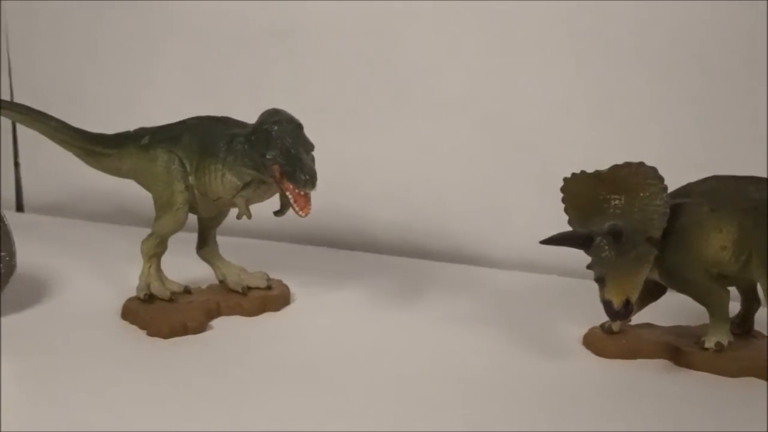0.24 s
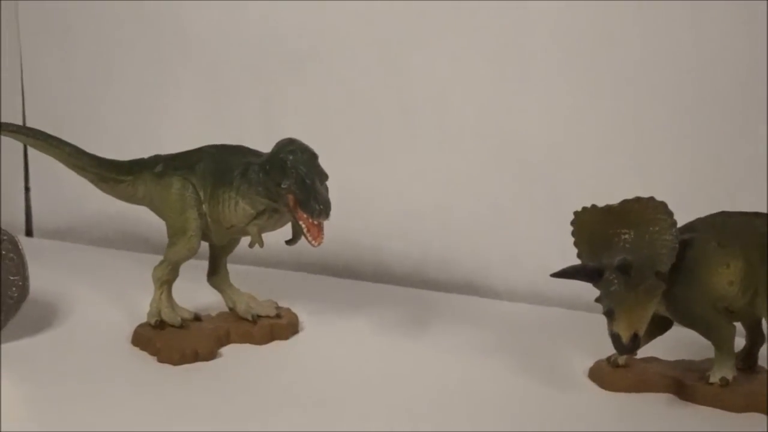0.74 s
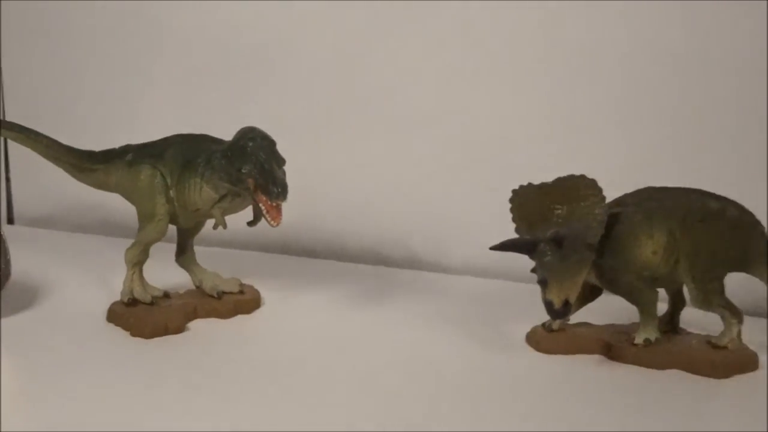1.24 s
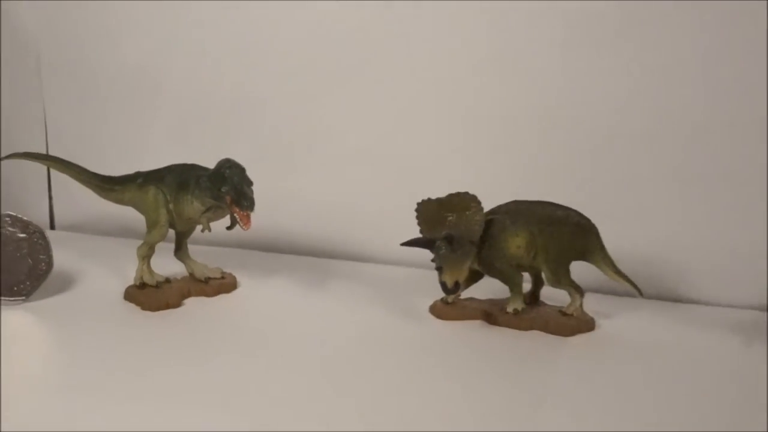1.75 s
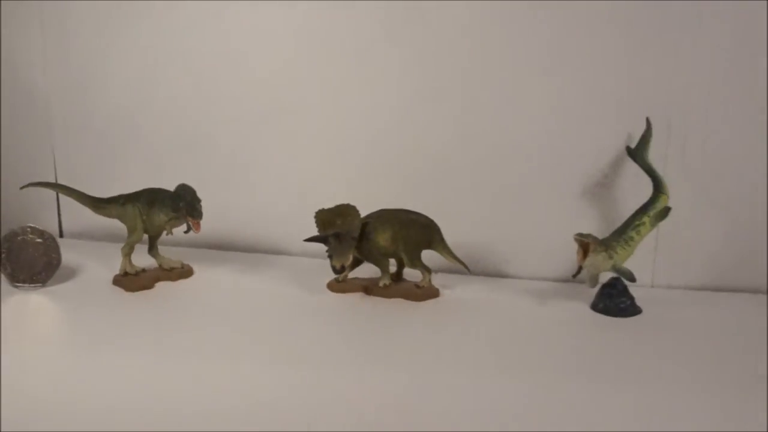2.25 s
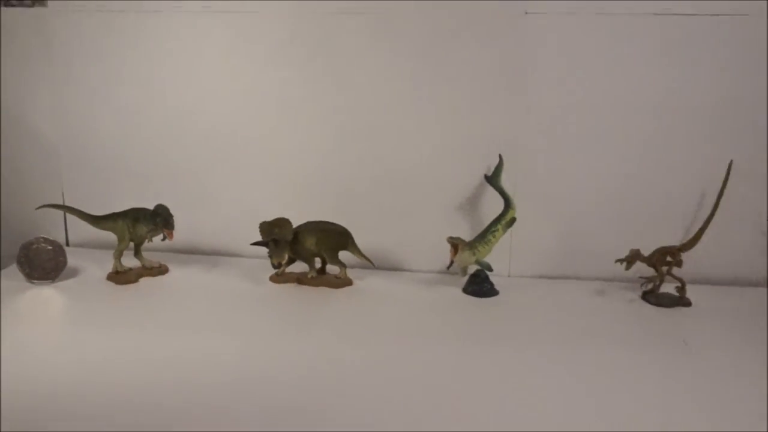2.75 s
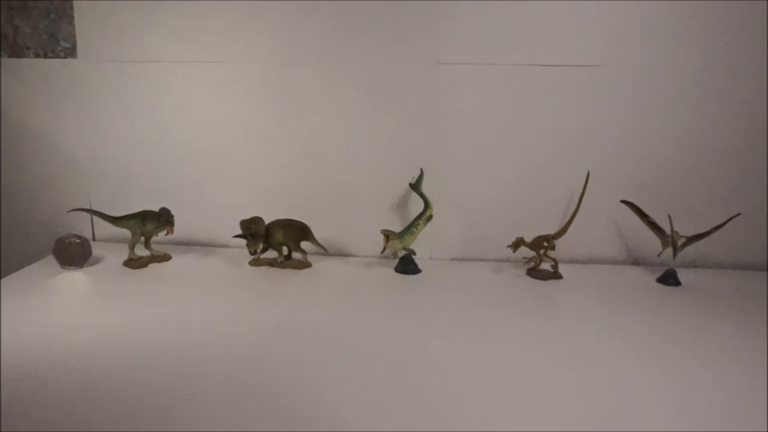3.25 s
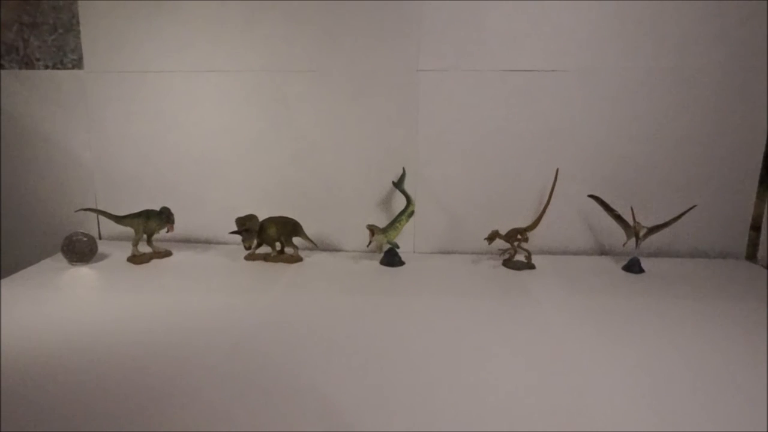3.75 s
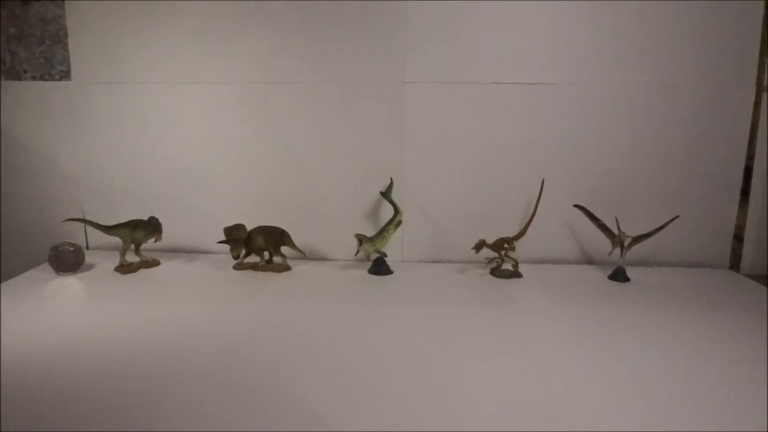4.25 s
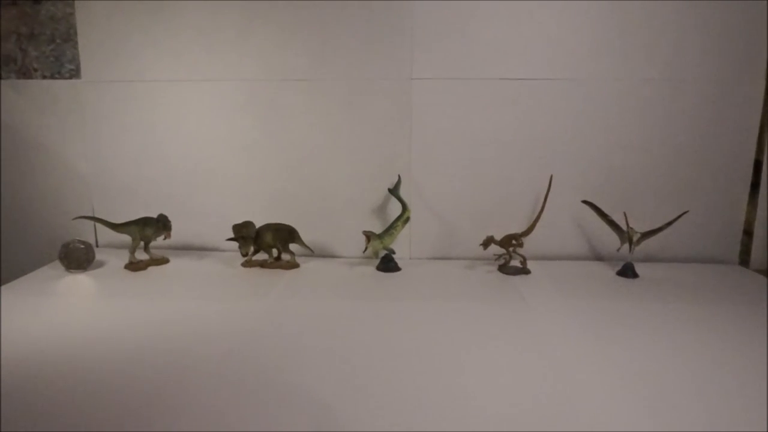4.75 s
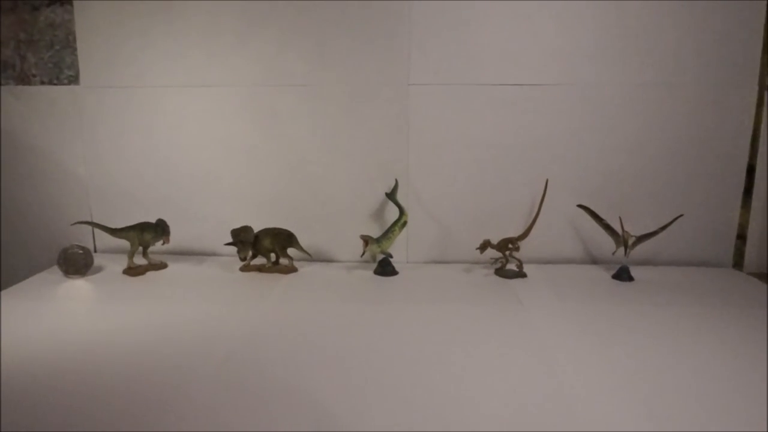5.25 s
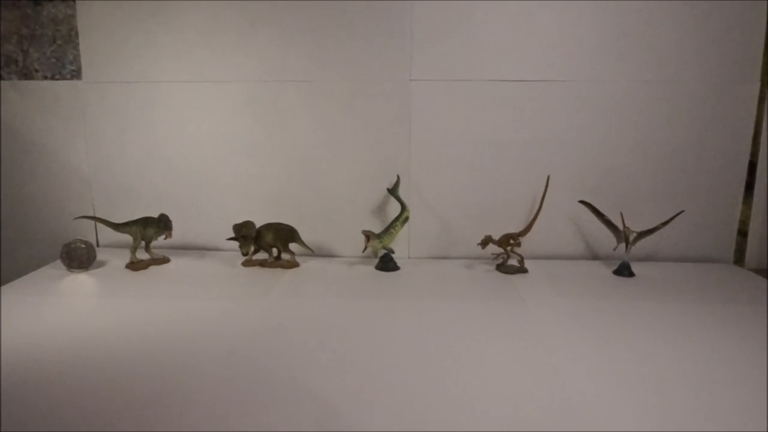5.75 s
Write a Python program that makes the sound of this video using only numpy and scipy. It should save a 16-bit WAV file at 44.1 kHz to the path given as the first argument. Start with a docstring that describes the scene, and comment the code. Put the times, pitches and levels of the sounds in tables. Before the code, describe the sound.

A camera's zoom motor is heard right at its built-in microphones, against soft indoor room tone. After slight finger handling, it starts with a knock and whirs for about two seconds, a thin plastic gear whine above a humming, scraping lens barrel. The lens clicks sharply soon after starting and clacks against its stop with a tiny spring ring. Then only quiet hiss and a few small taps remain.

```python
"""Camera zooming out, close up

A quiet room, heard from the camera's own two microphones, right on the body. Fingers tick and rub;
the gears take up with a knock, then rattle the plastic housing into a high whine over the barrel's hum.
A lens group snaps over on the way; at the end stop the barrel clacks, a spring rings and the motor runs
on briefly. Both hard clicks make the gain control duck, and the room tone creeps back afterwards."""
import sys
import numpy as np
from scipy import signal
from scipy.fft import rfft, irfft, next_fast_len
from scipy.io import wavfile
from scipy.ndimage import map_coordinates

SR = 44100
rng = np.random.default_rng(int(sys.argv[2]) if len(sys.argv) > 2 else 0)


def master(y):
    """Save y as 16-bit WAV."""
    cut = np.clip(np.atleast_2d(y).T, -1, 1)
    pcm = np.round(cut * 32767)  # scale
    wavfile.write(sys.argv[1], SR, pcm.astype(np.int16))


N = 263806
TIME = np.arange(N) / SR
FFT_SIZE = next_fast_len(N, real=True)
FREQ = np.maximum(np.arange(FFT_SIZE // 2 + 1) * SR / FFT_SIZE, 1)
MOTOR_ON_S, JUDDER_END_S, END_STOP_S, MOTOR_OFF_S = 1.166, 2.95, 3.28, 3.402

# Pan and lead are the left microphone's level and phase against the right's.
# path through the camera body: (frequency [Hz], lead [rad])
BODY_LEAD = [(50, -.15), (400, -.65), (800, -1.2), (1400, -2.2), (2500, -2.6), (3700, -2.4), (4800, -.8),
             (7500, -.5), (15000, -.3)]
# room tone and microphone hiss: (frequency [Hz], level [dB])
ROOM_SPECTRUM = [(25, -17.5), (49, -2.5), (75, -7.5), (200, -4.5), (360, -3), (470, -5), (800, -5),
                 (1150, -6.5), (1480, -4.5), (1900, -9.5), (3000, -10.5), (4200, -14), (8000, -16.5),
                 (15000, -18.5)]
# sliding finger: (frequency [Hz], level [dB])
FINGER_SPECTRUM = [(50, -21), (130, -2), (280, 0), (700, -6), (1500, -11.5), (4000, -12.5), (6000, -15),
                   (12000, -27.5)]
# fingertips on body and lever: (time [s], level [dB], decay [ms], tilt [dB/octave], ring [Hz], ring [dB])
FINGER_TICKS = [(0.842, -42.5, 2.8, 1, 5100, -7), (0.856, -45.5, 8.8, -1.5, 885, -4),
                (0.987, -49, 4, 0.5, 6200, -6), (1.014, -53, 4.4, 11, 6900, -8),
                (1.069, -51, 5.6, -7, 1580, -6), (1.125, -42.5, 1.3, 4.5, 6040, -3),
                (3.763, -52.5, 2.9, 0, 3120, -1), (4.849, -53.5, 30, 1.5, 3200, -2.5),
                (4.868, -45.5, 1.9, -1, 1560, 4), (4.869, -48, 2.5, 3, 3290, 6),
                (5.62, -37, 1.14, 13, 6960, -4), (5.668, -60.5, 60, 6.5, 7150, -5.5),
                (5.845, -38, 3.8, 0.5, 1380, -17), (5.8448, -36, 1.6, 13.5, 7570, -0.5)]
# one fingertip tick: (frequency [Hz], level [dB])
TICK_SPECTRUM = [(100, -10), (250, -6.5), (600, 5.5), (1100, 1), (2100, 6), (2750, 2), (3300, 6),
                 (3900, -9), (4350, -8.5), (5050, -9), (5850, -4), (6600, -12), (7600, -7), (9900, -13.5),
                 (15000, -25)]
# soft low bumps of the camera body: handling, and a quick even run after the stop, probably
# autofocus steps: (time [s], level [dB], decay [ms], pitch [Hz])
BODY_BUMPS = [(1.035, -38, 4.2, 250), (1.073, -50, 6, 210), (1.18, -33, 3, 220), (3.518, -47, 5, 240),
              (3.589, -51, 4, 230), (3.635, -53, 5, 220), (3.701, -53, 5, 230), (3.757, -51, 4.5, 250),
              (4.108, -54, 5, 170), (4.326, -54, 9, 215), (4.851, -52, 10, 400), (4.861, -52, 6, 200),
              (4.871, -48, 19, 200), (4.96, -58, 14, 250), (5.047, -58, 14, 270)]
# drag of the barrel in its guides: (time [s], rumble [dB], scrape [dB])
BARREL_DRAG = [(1.24, -60.5, -46.5), (1.33, -50, -43.5), (1.41, -50.5, -47.5), (1.47, -53, -47),
               (1.62, -53.5, -52.5), (1.95, -47.5, -47.5), (2.25, -52.5, -43), (2.45, -58, -45.5),
               (2.8, -72, -48.5), (3.08, -55, -50.5), (3.28, -57, -53)]
# barrel rumble: (frequency [Hz], level [dB])
RUMBLE_SPECTRUM = [(25, -24), (55, -11.5), (100, -1), (170, -1.5), (250, 0), (400, -16), (800, -45)]
# scrape of the guides: (frequency [Hz], level [dB])
SCRAPE_SPECTRUM = [(100, -30.5), (250, -11.5), (450, 0), (600, -3), (850, -5.5), (1200, -10.5),
                   (1700, -11.5), (3000, -24)]
# judder of the barrel: (time [s], pitch [Hz], level [dB])
BARREL_JUDDER = [(1.25, 348.4, -68), (1.47, 342, -47), (1.58, 335.6, -50), (1.68, 350, -46),
                 (1.9, 366.4, -48), (2.02, 351.4, -49), (2.1, 355, -38.5), (2.22, 341.7, -40),
                 (2.27, 345, -47), (2.5, 359.9, -46), (2.57, 339, -55), (2.66, 306, -56),
                 (2.73, 299.4, -69), (2.79, 292, -46.5), (2.83, 250, -48), (2.87, 219, -46),
                 (2.9, 222, -60), (2.922, 237.3, -36.5), (2.95, 270, -66)]
# jolts in the guides: (time [s], level [dB], decay [ms])
BARREL_JOLTS = [(1.297, -28.5, 5), (1.304, -31, 2.5), (1.325, -35, 4), (1.353, -32, 5), (1.379, -39.5, 3),
                (1.445, -35.5, 6), (1.463, -34, 6), (1.479, -35, 4), (1.691, -35.5, 4.1), (1.827, -39, 4),
                (2.065, -41, 4), (2.161, -38.5, 4), (2.222, -35, 3), (2.315, -39.5, 5)]
# tight spots of the zoom ring: (time [s], half-length [s], extra hiss [dB], extra chatter [dB])
TIGHT_SPOTS = [(1.683, 0.1, 4, -2), (2.14, 0.17, 7.5, 4), (2.63, 0.19, 9, 0.5), (3.225, 0.041, 5.5, -2)]
# spring modes: (frequency [Hz], level [dB], t60 [s])
SPRING_MODES = [(1386, -22, .28), (1663, -24, .17), (2426, 0, .17), (2869, -12, .1), (4177, -24, .25)]
# blows that reach the spring: (time [s], level [dB])
SPRING_BLOWS = [(1.5612, -45), (3.2757, -31)]
# lens group snapping over and settling: (time [s], level [dB], decay [ms], tilt [dB/octave])
LENS_SNAPS = [(1.56, -3.5, 0.88, -0.5), (1.563, -27.5, 7.6, -6), (1.58, -35.5, 7.4, -13)]
# lens group modes: (frequency [Hz], width [Hz], level [dB], pan [dB], lead [rad])
LENS_MODES = [(548, 430, -25.5, -3.5, 4), (1653, 250, -16, -5.5, 4.5), (2451, 350, -14, -0.5, -9.5),
              (2913, 510, -7, 10.5, -4), (3820, 830, -7.5, -10, -4.5), (4550, 643, -8.5, 9.5, 7),
              (5660, 390, -3.5, -7, 1), (7000, 600, -6.5, -2, 0.5), (7850, 880, 1.5, -3, 0.5),
              (9270, 470, -3.5, -11.5, 5), (10670, 740, -9, 6.5, 1), (12500, 630, -4.5, 0.5, 1),
              (14680, 1200, -13.5, 2.5, 0)]
# barrel meeting its end stop:
# (time [s], level [dB], decay [ms], rise [ms], hardness [0-1], pan [dB], tilt [dB/octave])
STOP_CLACKS = [(3.1962, -28, 1.1, 0.5, .15, 3, 1), (3.269, -26.5, 2, 12, 0, 0, 2),
               (3.2722, -10.5, 1.1, 0.9, .1, -2, -1), (3.2754, -6, 0.7, 0.12, .35, -8, 3),
               (3.2764, -2.5, 0.7, 0.3, .65, 4, 0), (3.2785, -17.5, 3.5, 0.6, .05, 1, -2),
               (3.283, -19.5, 1.4, 0.6, .3, 0.5, 1.5)]
# barrel modes at the stop: (frequency [Hz], width [Hz], level [dB], pan [dB], lead [rad])
BARREL_MODES = [(830, 230, -16, -4, 0.2), (1155, 280, -19, -2, 2), (1550, 420, -5, -13, -1),
                (2400, 480, -5, 1.5, -4), (3150, 420, 0, -5, 3), (3950, 750, 3.2, -1.5, 1.7),
                (4550, 500, -9, 0, 1), (5870, 800, -12, -1, 1.2), (6600, 550, -15, -8, 3.5),
                (7600, 520, -10, -2, -0.4), (8810, 1200, -15, -6, -1.5), (11500, 760, -14, -10, 0.5),
                (12400, 1200, -16, -8, -1.5), (14200, 1200, -19.5, -0.5, 1)]
# crack of a hard contact: (frequency [Hz], level [dB])
CRACK_SPECTRUM = [(300, -17.5), (1400, -7), (3300, -4.5), (4900, -5.5), (6600, -1), (9000, -4.5),
                  (11000, -14.5), (15500, -15.5)]
# gears knocking in their play: (time [s], level [dB], decay [ms], tilt [dB/octave])
GEAR_KNOCKS = [(1.173, -33.5, 3.8, 0.5), (1.179, -21.5, 2.2, -4), (1.187, -18.5, 6.3, 2),
               (1.2104, -28.5, 6.7, 0)]
# one dull knock: (frequency [Hz], level [dB])
KNOCK_SPECTRUM = [(60, -20), (200, -2), (450, -2), (720, 3.5), (1100, -2.5), (1600, 2), (2200, 0),
                  (2550, -6), (2830, -4.5), (3300, -17), (4000, -26.5), (5000, -31), (15000, -54)]
# hiss of sliding teeth: (frequency [Hz], level [dB])
SLIDE_SPECTRUM = [(1000, -6), (1600, -5), (2050, -5.5), (2600, 1.5), (3150, -6), (4300, 10), (5200, -7),
                  (6300, -0.5), (8500, 2.5), (9400, -6), (10500, 0.5), (11700, -18.5), (13000, -6.5),
                  (15600, -9.5)]
# plastic housing modes: (frequency [Hz], width [Hz], level [dB], pan [dB], lead [rad])
HOUSING_MODES = [(2480, 220, -10.5, -4, -2.5), (2721, 240, -11, 8, -2), (3697, 320, -0.5, 6, -2.5),
                 (3777, 200, -1.5, 4, -2), (4105, 140, -3, 5.5, 1.5), (4410, 380, -16, 5, -1)]
# its overtones, rung by the fine teeth: (frequency [Hz], width [Hz], level [dB], pan [dB], lead [rad])
HOUSING_OVERTONES = [(6070, 500, -12, -9.5, -.5), (6700, 290, -1, -8, -.9), (7580, 420, 5, 4, -.1),
                     (8340, 490, -2.5, 3, -0.59), (9970, 560, -7, -9.5, 0), (10730, 610, -14, -2, 0),
                     (12900, 900, -12.5, 16, 0), (14150, 700, -8.5, 5.5, -.2)]
# course of the gear whine: (time [s], level [dB])
WHINE_LEVEL = [(1.2, -44), (1.45, -40), (1.6, -42), (1.85, -39), (2.12, -39), (2.3, -41), (2.66, -35.5),
               (3.14, -38), (3.24, -34), (3.32, -49.5), (3.38, -40)]


def undb(db):
    """Decibels to gain."""
    return 10 ** (np.asarray(db) / 20)


def unit(x):
    """Scale to rms 1."""
    return x / np.sqrt(np.mean(x ** 2))


def curves(rows):
    """Each column after the time as a control signal."""
    s, *columns = np.transpose(rows)
    return [np.interp(TIME, s, column) for column in columns]


def panned(db):
    """Left and right gains for a level difference."""
    return undb(np.array([[db], [-db]]) / 2)


def filtered(x, response):
    """Apply a frequency response."""
    return irfft(rfft(x, FFT_SIZE) * response, FFT_SIZE)[..., :N]


def colour(x, spectrum, tilt_db=0):
    """Filter by a spectrum, keeping the power of white noise."""
    hz, db = np.transpose(spectrum)
    shape_db = np.interp(np.log(FREQ), np.log(hz), db)
    return filtered(x, unit(undb(shape_db + tilt_db * np.log2(np.maximum(FREQ, hz[0])))))


def noise(likeness):
    """White noise at the two microphones; likeness is their correlation."""
    mid, side = rng.standard_normal((2, N))
    return (np.sqrt(1 + likeness) * mid + np.sqrt(1 - likeness) * side * np.array([[1], [-1]])) / np.sqrt(2)


def walk(rate):
    """Smooth chance with spread 1 that changes about rate times a second."""
    return unit(filtered(rng.standard_normal(N), np.exp(-(FREQ / rate) ** 2)))


def resonate(x, modes, tilt_db=0):
    """Ring steep resonances; each reaches the two microphones with its own level and phase."""
    response = 0
    for hz, width, db, pan_db, lead in modes:
        band = 1 / (1 + 1j * (FREQ / hz - hz / FREQ) * hz / width) ** 2
        sides = unit(panned(pan_db)) * np.exp(.5j * lead * np.array([[1], [-1]]))
        response = response + undb(db + tilt_db * np.log2(hz)) * sides * band
    return filtered(x, response / np.sqrt(np.mean(abs(response) ** 2)))


def through_body(x):
    """Sound in the camera body reaches the left microphone later than the right."""
    hz, radians = np.transpose(BODY_LEAD)
    lead = np.interp(np.log(FREQ), np.log(hz), radians)
    return filtered(x, np.exp(.5j * lead * np.array([[1], [-1]])))


def running(start, stop, coast_s):
    """Quick run-up, then a short coast after the stop."""
    return np.clip((TIME - start) / 0.00416, 0, 1) * np.exp(-np.maximum(TIME - stop, 0) / coast_s)


def burst(s, db, decay_ms, pan_db, likeness, rise_ms, hardness=0):
    """One contact: a sharp push (its share of the energy is hardness) and a grating that dies quickly."""
    ms = (TIME - s) * 1000
    shape = np.exp(-np.where(ms < 0, -ms / rise_ms, ms / decay_ms).clip(0, 60))
    push = unit(signal.unit_impulse(N, int(s * SR)))
    grating = unit(noise(likeness) * shape)
    contact = np.sqrt(hardness) * push + np.sqrt(1 - hardness) * grating
    return contact * np.sqrt(np.mean(shape ** 2)) * undb(db) * panned(pan_db)


def room_tone(level_db=-59, whistle_hz=15625, whistle_db=-14):
    """Room murmur, alike on both sides in the bass, with microphone hiss and a thin electronic whistle."""
    shared = np.sqrt(.8 / (1 + (FREQ / 650) ** 2))
    air = filtered(rng.standard_normal(N), shared) + filtered(noise(0.092), np.sqrt(1 - shared ** 2))
    murmur = through_body(colour(air, ROOM_SPECTRUM)) * undb(.5 * walk(8))
    whistle = np.sin(2 * np.pi * whistle_hz * TIME)
    return undb(level_db) * (murmur + undb(whistle_db) * whistle)


def reflections(x, wet_db=-23, t60=0.14):
    """The table and near walls return a faint, short tail."""
    age = TIME[:SR // 2]
    tail = rng.standard_normal((2, len(age))) * np.exp(-np.log(1000) * age / t60)
    return undb(wet_db) * signal.fftconvolve(x, unit(tail) / np.sqrt(len(age)), axes=1)[:, :N]


def finger_rub(at_s=1.0, half_s=0.28, level_db=-59, rough_db=3):
    """Handling noise: a finger rubs unevenly over the body onto the zoom lever."""
    pressure = np.exp(-((TIME - at_s) / half_s) ** 2) * undb(level_db + rough_db * walk(33))
    return through_body(colour(noise(0.33), FINGER_SPECTRUM)) * pressure


def finger_tick(s, db, decay_ms, tilt_db, ring_hz, ring_db, width_hz=890):
    """A fingertip ticks on the body, and the spot it touches rings briefly."""
    touch = burst(s, db, decay_ms, pan_db=-2, likeness=0.22, rise_ms=0.3)
    ring = resonate(touch, [(ring_hz, width_hz, 0, 0, 0)])
    return (colour(touch, TICK_SPECTRUM, tilt_db) + undb(ring_db) * ring) / np.hypot(1, undb(ring_db))


def body_bump(s, db, decay_ms, hz, rise_ms=.4, overtone=1.74, overtone_db=-12):
    """A soft low bump of the camera body: a few damped cycles with a shorter overtone."""
    ms = np.maximum(TIME - s, 0) * 1000
    phase = 2 * np.pi * hz * (TIME - s)
    fade = np.exp(-(ms / decay_ms).clip(0, 60))
    ring = np.sin(phase) * fade + undb(overtone_db) * np.sin(overtone * phase) * fade ** 2
    return undb(db) * (1 - np.exp(-ms / rise_ms)) * ring * panned(-2.5)


def tightness():
    """Extra hiss and chatter in dB: each tight spot swells and fades as a bell curve."""
    return sum(np.outer([hiss_db, chatter_db], np.exp(-((TIME - s) / half_s) ** 2))
               for s, half_s, hiss_db, chatter_db in TIGHT_SPOTS)


def barrel(chatter_db=-46.5):
    """The sliding barrel scrapes and judders at its resonance, which sinks towards the wide end."""
    rumble_db, scrape_db = curves(BARREL_DRAG)
    judder_hz, judder_db = curves(BARREL_JUDDER)
    _, tight_db = tightness()
    waver_hz, uneven_db = 9 * walk(60), 2.5 * walk(45)
    phase = 2 * np.pi * np.cumsum(judder_hz + waver_hz) / SR
    judder = unit(np.sin(phase) * undb(uneven_db)) * running(MOTOR_ON_S, JUDDER_END_S, .06)
    # loose play chatters around the judder's pitch and outlasts it
    chatter = walk(89) * np.sin(phase) + walk(100) * np.cos(phase)
    chatter *= running(MOTOR_ON_S, JUDDER_END_S, 0.22)
    hum = undb(judder_db) * judder + undb(chatter_db + tight_db) * chatter
    rumble = undb(rumble_db) * colour(noise(0.76), RUMBLE_SPECTRUM)
    rumble *= running(MOTOR_ON_S, END_STOP_S, 0.18)
    scrape = undb(scrape_db) * colour(unit(noise(0.15) * undb(2.4 * walk(52))), SCRAPE_SPECTRUM)
    return through_body((hum + scrape) * running(MOTOR_ON_S, END_STOP_S, .025) + rumble)


def barrel_jolts():
    """The barrel jolts in its guides, each time a short scrape."""
    jolts = sum(burst(*row, pan_db=-1.5, likeness=0.69, rise_ms=0.94) for row in BARREL_JOLTS)
    return colour(jolts, SCRAPE_SPECTRUM)


def spring():
    """A small spring rings on after the hard blows, louder in the right microphone."""
    ring = 0
    for s, blow_db in SPRING_BLOWS:
        age = np.maximum(TIME - s, 0)
        for hz, db, t60 in SPRING_MODES:
            ring += undb(blow_db + db) * np.sin(2 * np.pi * hz * age) * np.exp(-np.log(1000) * age / t60)
    return ring * panned(-7)


def lens_snap(crack_db=-15.5):
    """A lens group snaps over and settles; each contact rings it and cracks."""
    ring = sum(resonate(burst(*row, pan_db=0, likeness=0.62, rise_ms=0.23, hardness=0.7), LENS_MODES, tilt)
               for *row, tilt in LENS_SNAPS)
    crack = sum(burst(*row, pan_db=-7, likeness=0.388, rise_ms=.3) for *row, _ in LENS_SNAPS)
    return ring + undb(crack_db) * colour(crack, CRACK_SPECTRUM)


def stop_clack(s, db, decay_ms, rise_ms, hardness, pan_db, tilt_db, crack_db=-5):
    """One contact with the end stop rings the barrel and cracks."""
    blow = burst(s, db, decay_ms, pan_db, likeness=0.75, rise_ms=rise_ms, hardness=hardness)
    crack = burst(s, db + crack_db, decay_ms, pan_db, likeness=0.26, rise_ms=rise_ms)
    return resonate(blow, BARREL_MODES, tilt_db) + colour(crack, CRACK_SPECTRUM)


def gear_knock(s, db, decay_ms, tilt_db):
    """The gears take up their play with a dull knock."""
    blow = burst(s, db, decay_ms, pan_db=-4.5, likeness=0.52, rise_ms=0.14)
    return colour(blow, KNOCK_SPECTRUM, tilt_db)


def gear_squeaks(turns, speed_hz, pitch_hz=3844, scatter_hz=110.2, half_ms=1.9, weak_db=-2):
    """The output gear catches twice a turn, strong and weak, each a tiny squeak with its own pitch."""
    half_turn, within = np.divmod(2 * turns, 1)
    from_catch_ms = 1000 * (within - .5) / (2 * speed_hz)
    strength = undb(weak_db * (half_turn % 2) + 2.5 * walk(65))
    phase = 2 * np.pi * np.cumsum(pitch_hz + scatter_hz * walk(80)) / SR
    return strength * np.exp(-(from_catch_ms / half_ms) ** 2) * np.sin(phase)


def snags(per_s=90, size_db=4, scatter_db=3, decay_ms=4.5):
    """Teeth snag at random: each snag lifts the whole rattle at once and lets go within milliseconds."""
    sizes = (rng.random(N) < per_s / SR) * undb(size_db + scatter_db * rng.standard_normal(N))
    keep = np.exp(-1000 / (decay_ms * SR))
    return unit(np.sqrt(1 + signal.lfilter([1], [1, -keep ** 2], sizes ** 2)))


def tooth_hiss(flutter):
    """The teeth hiss as they slide, and the fine ones ring the housing's overtones."""
    grip = unit(flutter * undb(0.53 * walk(25) + 0.8 * walk(500)))
    overtones = resonate(unit(flutter) * rng.standard_normal(N), HOUSING_OVERTONES)
    slide = colour(grip * noise(0.15), SLIDE_SPECTRUM)
    return slide + undb(-1 + .5 * walk(11)) * overtones


def load_drift(x, depth_s=.0005, rate=7):
    """The load on the gears keeps changing, so their resonances drift by a percent or two."""
    place = (TIME + depth_s * walk(rate)) * SR
    return np.array([map_coordinates(side, [place], order=3, mode="mirror") for side in x])


def gear_shake(turns, level_db=-62.5):
    """Running free after the end stop, the gears shake the body unevenly at the rate of their catches."""
    shake = unit(np.sin(4 * np.pi * turns) * undb(0.53 * walk(30) + 2.5 * walk(60)))
    return undb(level_db) * shake * running(END_STOP_S, MOTOR_OFF_S, 0.022)


def gears(full_hz=29.48, lag_hz=4, spin_up_s=.3, hiss_db=-48, ease_db_per_s=-2.5, free_run_db=-2.5):
    """Right by the microphones, rattling teeth and squeaking catches ring the housing into a whine."""
    age = np.maximum(TIME - MOTOR_ON_S, 0)
    tight_db, _ = tightness()
    speed_hz = full_hz - lag_hz * np.exp(-age / spin_up_s)  # of the output gear
    turns = np.cumsum(speed_hz * (1 + 0.035 * walk(27))) / SR
    squeaks = unit(resonate(gear_squeaks(turns, speed_hz), HOUSING_MODES))
    # a small pinion, six times as fast, makes the rattle flutter
    flutter = undb(0.85 * np.cos(2 * np.pi * 6 * turns)) * snags()
    rattle = unit(rng.standard_normal(N) * flutter * undb(1.5 * walk(500) + 0.53 * walk(50)))
    squeak_gain = undb(-3 - .4 * tight_db)  # squeaks give way to rattle in the tight spots
    whine = (squeak_gain * squeaks + resonate(rattle, HOUSING_MODES)) / np.hypot(squeak_gain, 1)
    whine *= undb(curves(WHINE_LEVEL)[0] + .5 * walk(9))
    hiss = tooth_hiss(flutter)
    hiss *= undb(hiss_db + ease_db_per_s * age + tight_db + free_run_db * (TIME > END_STOP_S))
    return load_drift(whine + hiss) * running(MOTOR_ON_S, MOTOR_OFF_S, .008) + gear_shake(turns)


def scene():
    """Zoom drive and handling up close, room tone behind; only the blows get the room's short tail."""
    knocks = sum(gear_knock(*row) for row in GEAR_KNOCKS)
    snap = lens_snap()
    clacks = sum(stop_clack(*row) for row in STOP_CLACKS)
    ticks = sum(finger_tick(*row) for row in FINGER_TICKS)
    bumps = sum(body_bump(*row) for row in BODY_BUMPS)
    blows = through_body(knocks + barrel_jolts() + bumps) + snap + clacks + ticks
    return gears() + barrel() + blows + reflections(blows) + spring() + room_tone() + finger_rub()


def gain_control(x, threshold_db=-6.5, max_cut_db=5, attack_s=0.024, recovery_db_per_s=1.84):
    """A loud peak turns the microphones down quickly; the gain creeps back over seconds."""
    peak_db = 20 * np.log10(abs(x).max(axis=0) + 1e-9)
    over_db = np.clip(peak_db - threshold_db, 0, max_cut_db)
    recovered_db = recovery_db_per_s * TIME
    cut_db = np.maximum.accumulate(over_db + recovered_db) - recovered_db
    keep = np.exp(-1 / (attack_s * SR))
    return x * undb(-signal.lfilter([1 - keep], [1, -keep], cut_db))


def record(dry):
    """The camera ducks after the hard clicks, clips at full scale and cuts the top."""
    top_cut = signal.ellip(10, .2, 70, 15800, fs=SR, output="sos")
    return signal.sosfilt(top_cut, np.clip(gain_control(dry), -1, 1))


dry = scene()
out = record(dry)
master(out)
```